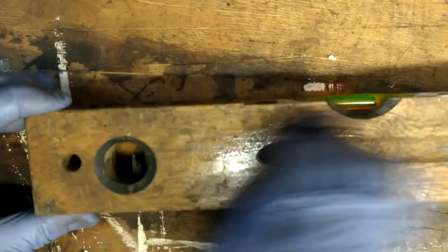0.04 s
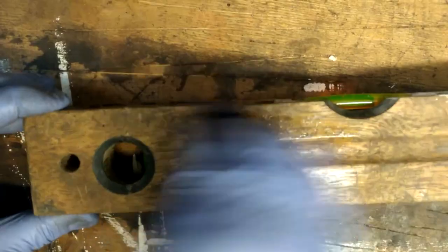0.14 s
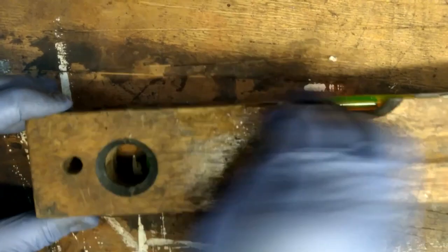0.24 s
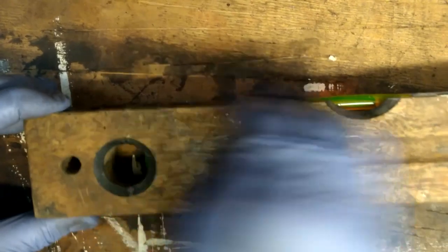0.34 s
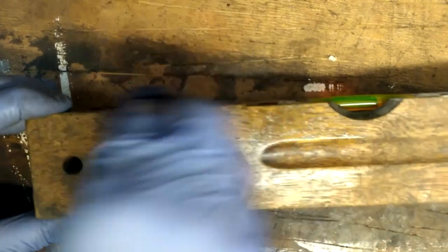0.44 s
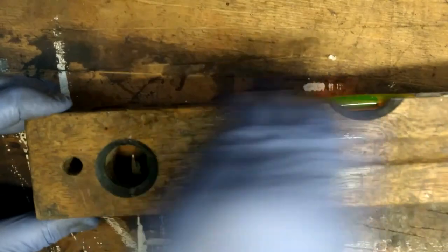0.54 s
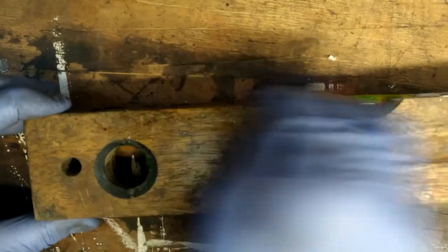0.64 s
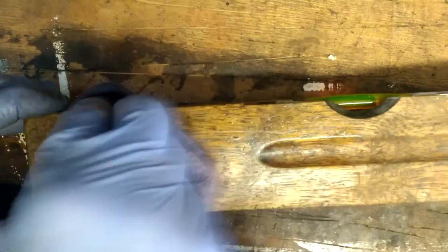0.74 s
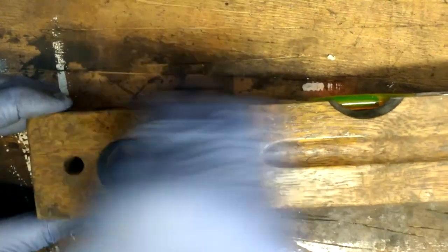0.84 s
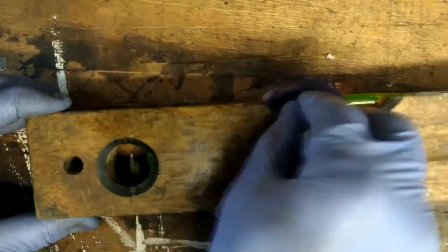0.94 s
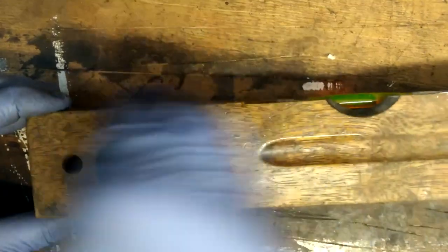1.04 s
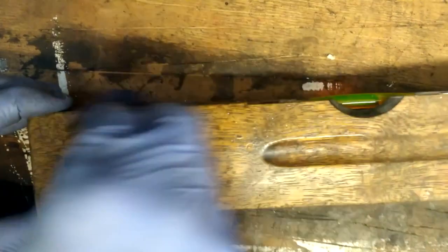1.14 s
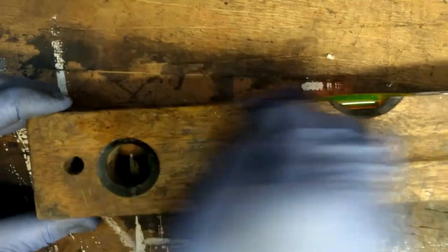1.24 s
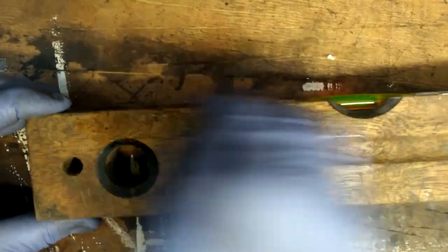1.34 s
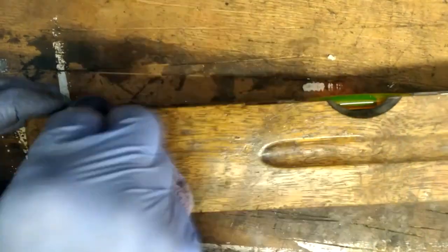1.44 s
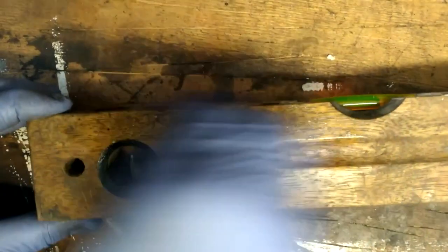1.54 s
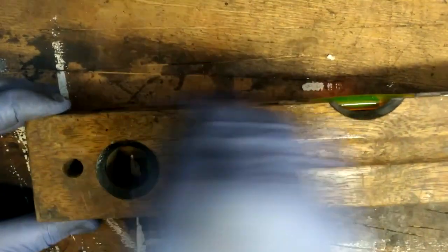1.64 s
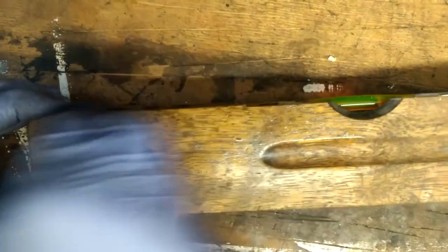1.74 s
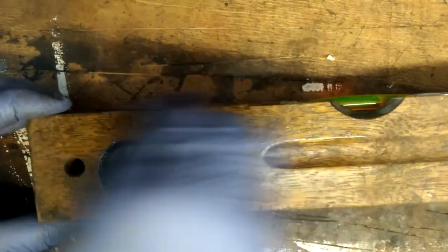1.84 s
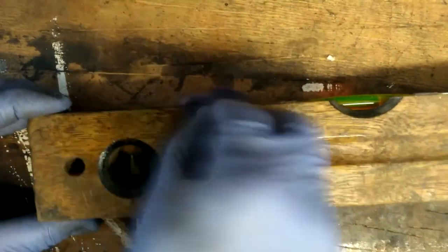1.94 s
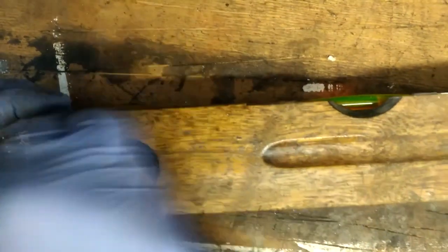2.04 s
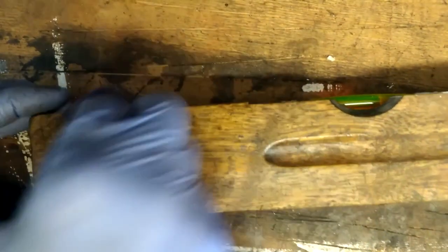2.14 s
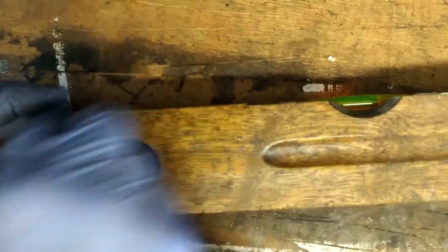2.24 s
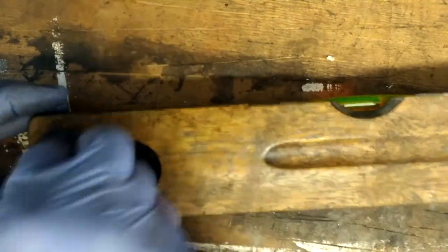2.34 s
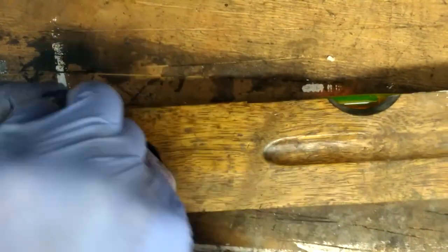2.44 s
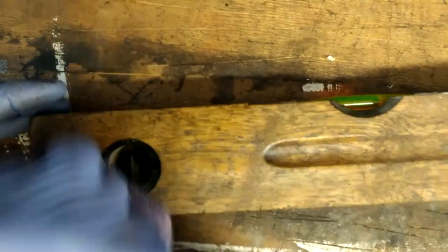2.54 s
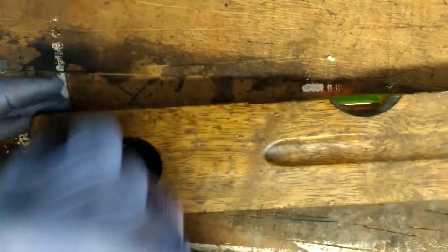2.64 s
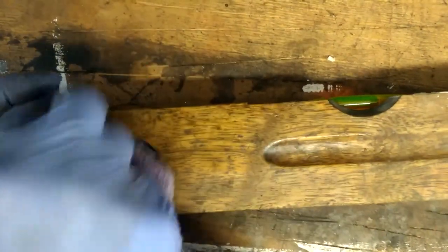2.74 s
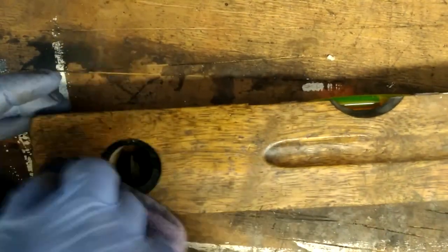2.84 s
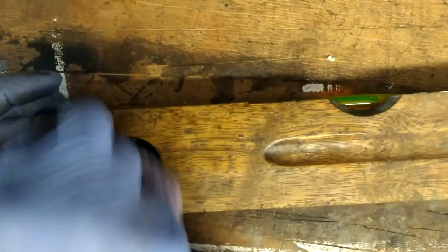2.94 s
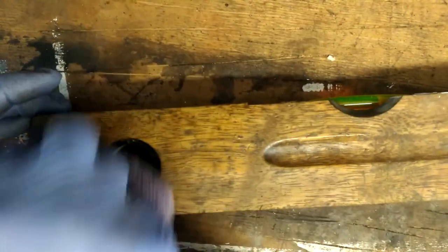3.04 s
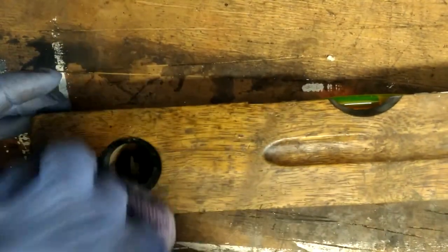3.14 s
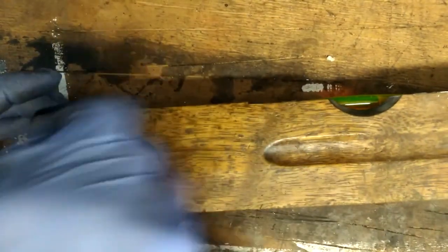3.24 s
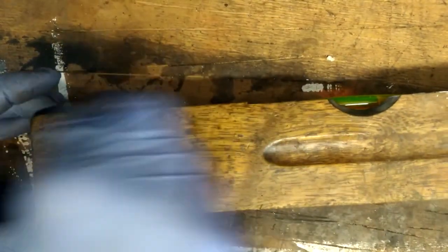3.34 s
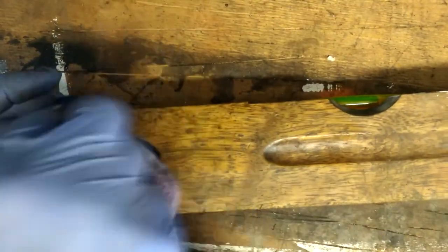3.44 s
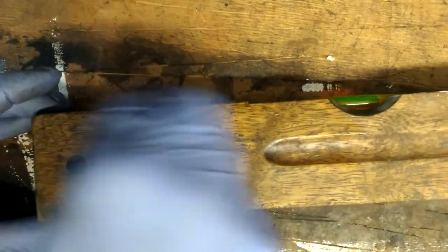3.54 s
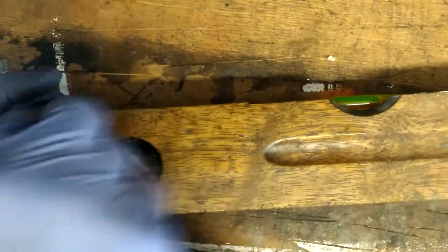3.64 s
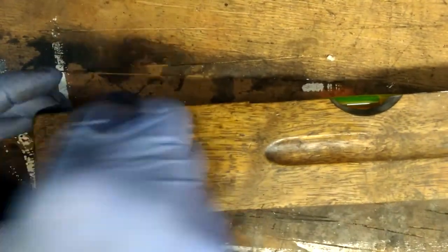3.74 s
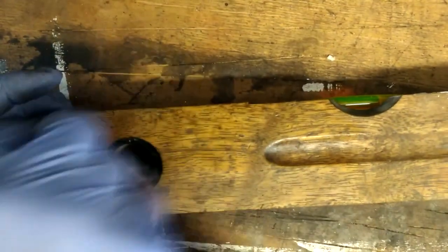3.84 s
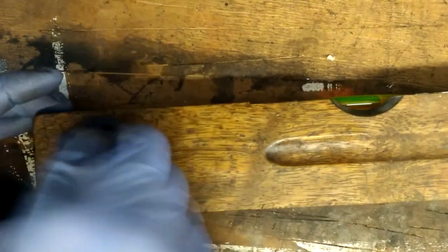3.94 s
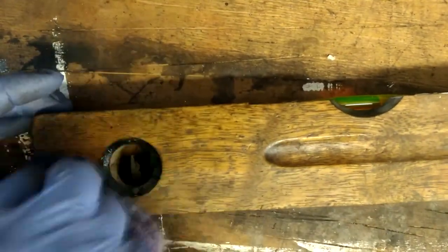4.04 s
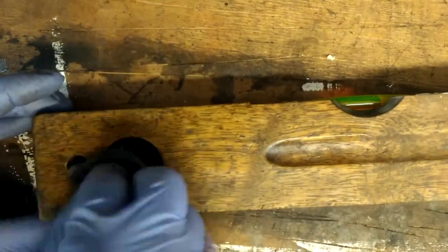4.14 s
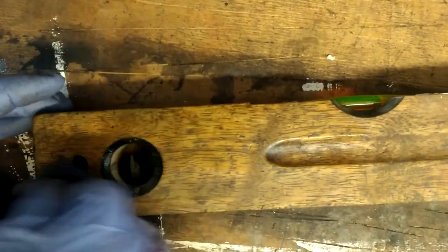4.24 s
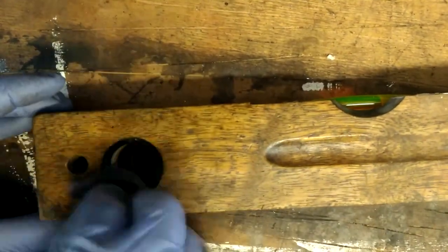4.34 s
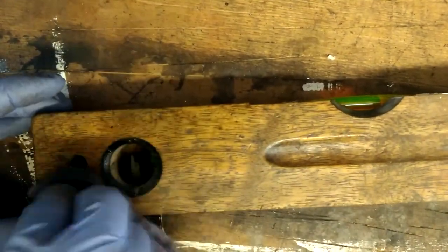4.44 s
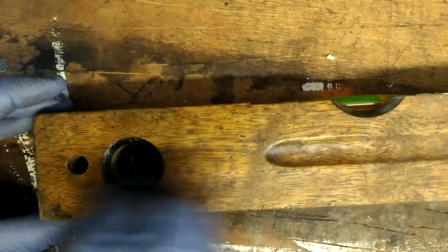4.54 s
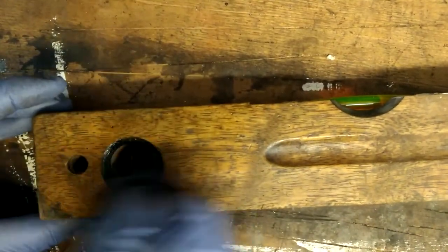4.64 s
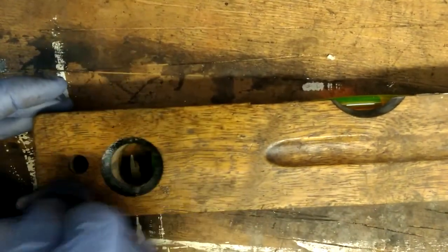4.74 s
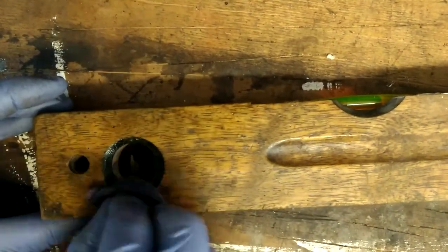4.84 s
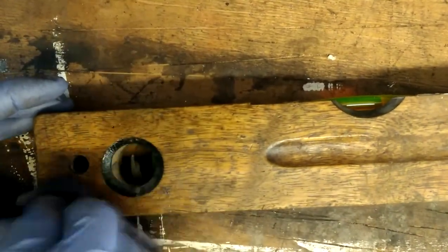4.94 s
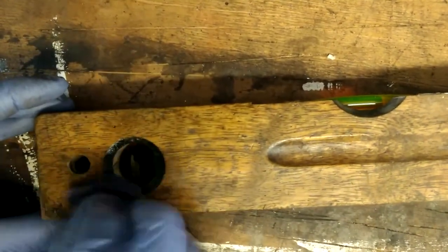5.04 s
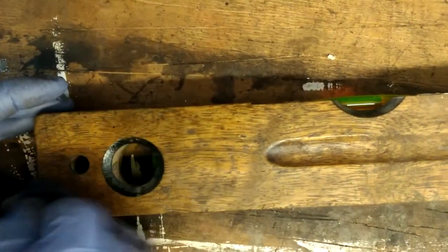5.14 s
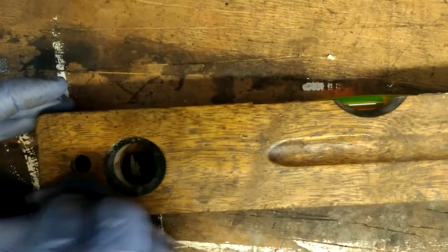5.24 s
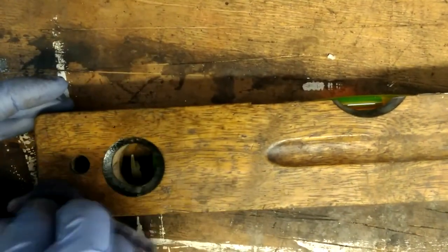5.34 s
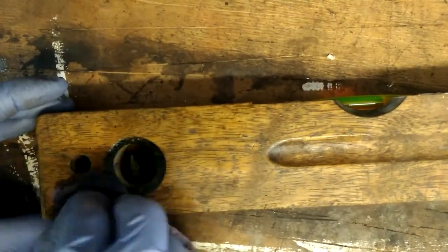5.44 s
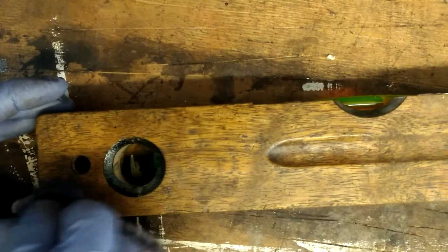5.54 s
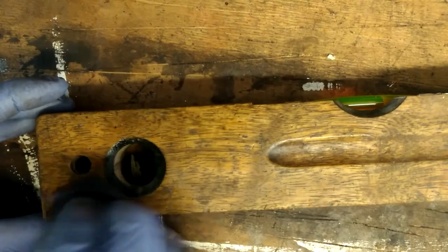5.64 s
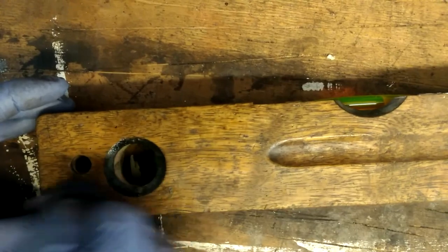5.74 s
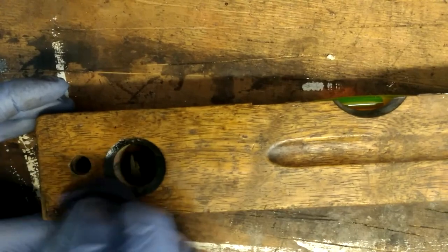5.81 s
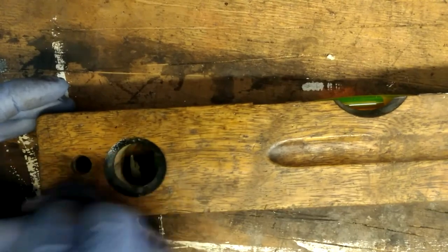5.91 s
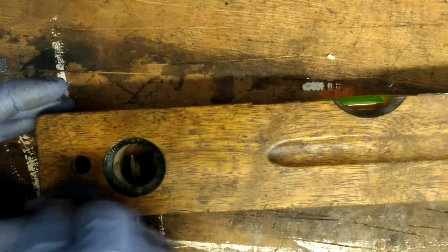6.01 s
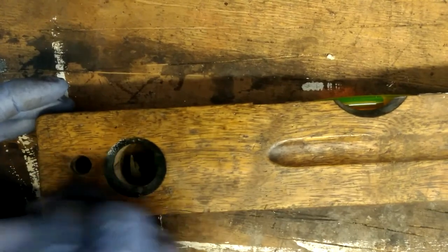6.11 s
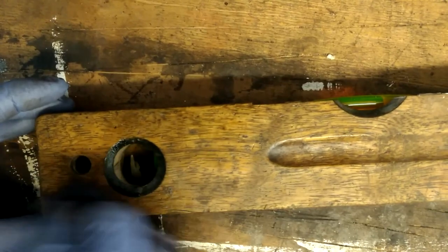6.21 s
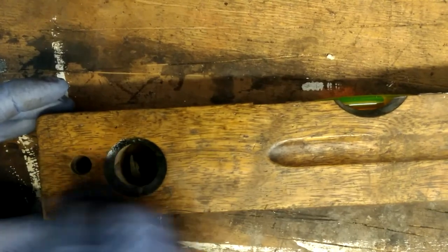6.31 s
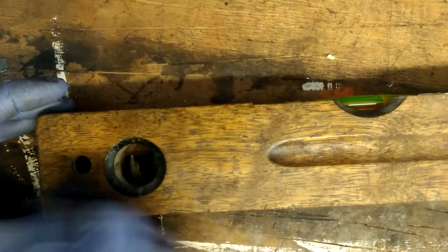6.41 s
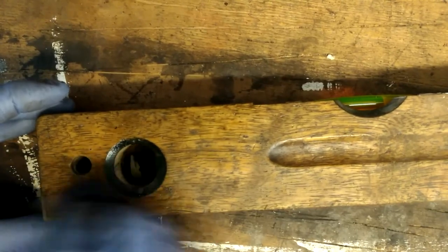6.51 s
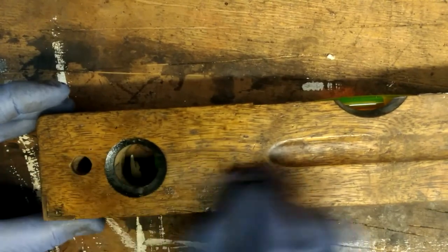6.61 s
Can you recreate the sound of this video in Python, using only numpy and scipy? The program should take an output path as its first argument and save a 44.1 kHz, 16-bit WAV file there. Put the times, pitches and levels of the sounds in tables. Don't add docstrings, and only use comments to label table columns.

```python
import sys
import numpy as np
from scipy import signal
from scipy.fft import rfft, irfft
from scipy.io import wavfile
from scipy.ndimage import uniform_filter1d

SR = 44100
rng = np.random.default_rng(int(sys.argv[2]) if len(sys.argv) > 2 else 0)


def log_audio(samples):
    frames = np.atleast_2d(samples).T
    limited = np.clip(frames, -1, 1)
    pcm = np.round(limited * 32767).astype(np.int16)
    wavfile.write(sys.argv[1], SR, pcm)


def elevation(decibels):
    levels = np.asarray(decibels, float)
    return 10 ** (levels / 20)


N = 294147
T = np.arange(N) / SR


def evened(x):
    return x / np.sqrt(np.mean(x ** 2) + 1e-20)


def read(points, hz):
    f, value = np.transpose(points)
    return np.interp(np.log(hz + 1), np.log(f + 1), value)


def coloured(x, points):
    hz = np.fft.rfftfreq(len(x), 1 / SR)
    return irfft(rfft(x) * elevation(read(points, hz)), len(x))


def resonate(x, hz, width):
    turn = np.exp(2j * np.pi * np.cumsum(hz * np.ones(len(x))) / SR)
    r = np.exp(-np.pi * width / SR)
    smooth = signal.lfilter([1 - r], [1, -r], x / turn)
    return 2 * (turn * smooth).real


def ring(x, modes):
    out = 0
    for k, (hz, width, db) in enumerate(modes):
        out = out + (-1) ** k * elevation(db) * resonate(x, hz, width)
    return out


def steadied(x, seconds, share):
    size = round(seconds * SR)
    power = uniform_filter1d(uniform_filter1d(x ** 2, size), size)
    return evened(x / (abs(power) + 1e-20) ** (share / 2))


def drift(seconds):
    size = max(round(seconds * SR), 2)
    return evened(uniform_filter1d(uniform_filter1d(rng.standard_normal(N), size), size))


def catches(per_s, spread_db):
    size_db = spread_db * np.minimum(rng.exponential(1, N), 5)
    size = elevation(size_db) * rng.choice([-1., 1.], N)
    return evened(size * (rng.random(N) < per_s / SR))


# (start [s], stop [s], speed [dB], pressure [dB])
FACE_STROKES = [(0.052, 0.119, -38.5, -42.5), (0.151, 0.235, -40, -41.5), (0.275, 0.355, -41, -47.5),
                (0.391, 0.488, -38, -43), (0.53, 0.657, -41, -45), (0.698, 0.814, -39, -39),
                (0.841, 0.987, -40, -41.5), (1.029, 1.143, -38, -39.5), (1.198, 1.329, -40, -41.5),
                (1.367, 1.493, -40, -40.5), (1.528, 1.665, -41.5, -41), (1.705, 1.833, -40.5, -41),
                (1.86, 1.99, -42.5, -41), (2.02, 2.129, -41.5, -41.5), (2.161, 2.224, -45, -41)]
# (start [s], stop [s], speed [dB], pressure [dB])
RIM_STROKES = [(2.269, 2.356, -43, -43), (2.442, 2.503, -42, -37.5), (2.55, 2.64, -43, -42.5),
               (2.677, 2.769, -43, -38), (2.814, 2.905, -43, -42.5), (2.958, 3.037, -42, -37.5),
               (3.084, 3.157, -41, -41.5), (3.211, 3.376, -43, -40), (3.415, 3.492, -45.5, -42),
               (3.527, 3.611, -45, -41.5), (3.643, 3.719, -41.5, -39.5), (3.761, 3.821, -44.5, -43),
               (3.861, 3.932, -45, -43.5), (3.959, 4.043, -46.5, -46), (4.048, 4.124, -47, -41),
               (4.146, 4.206, -45, -47)]
# (start [s], stop [s], speed [dB], pressure [dB])
EDGE_FLICKS = [(4.234, 4.3, -41, -47.5), (4.332, 4.406, -45.5, -46), (4.443, 4.507, -45.5, -47.5),
               (4.543, 4.648, -43.5, -46), (4.684, 4.783, -40, -45.5), (4.808, 4.889, -44, -43),
               (4.928, 5.007, -41.5, -43.5), (5.04, 5.108, -44, -43.5), (5.138, 5.214, -41.5, -43.5),
               (5.259, 5.309, -41, -40), (5.355, 5.406, -47.5, -45.5), (5.441, 5.496, -42, -46.5),
               (5.533, 5.583, -45, -44), (5.615, 5.671, -43, -43.5), (5.709, 5.753, -44, -45.5),
               (5.787, 5.847, -45.5, -42), (5.878, 5.934, -43, -46.5), (5.966, 6.026, -44.5, -43),
               (6.059, 6.121, -44, -46.5), (6.153, 6.214, -46.5, -43), (6.247, 6.302, -41.5, -47.5),
               (6.336, 6.404, -41.5, -43)]
# (start [s], stop [s], speed [dB], pressure [dB])
SLACK_STROKES = [
    (2.335, 2.44, -51, -50.5),
    (6.542, 6.707, -45.5, -52),
]
# (start [s], stop [s], speed [dB], pressure [dB])
LIFT_OFF = [
    (6.442, 6.514, -56, -73),
]
# (opening speed [dB], slower opening per length [dB/s],
# hole relative to pressure [dB], hole louder outward [dB])
MANNER = [
    (-44, 95, -12.5, 4),
    (-45.5, 40, -4, 1.5),
    (-53.5, 5, -4, 2.5),
    (-57, -13, -4, -1),
    (-44, 0, -4, 0),
]
# (time [s], level [dB])
ARM_WEIGHT = [(0, -9), (.3, -12), (.6, -18.5), (1.2, -18.5), (2.3, -15.5), (3.3, -16.5), (4.2, -13.5),
              (5.2, -17.5), (6.4, -16)]


def strokes():
    usual_s = 0.1
    tables = FACE_STROKES, RIM_STROKES, EDGE_FLICKS, SLACK_STROKES, LIFT_OFF
    rows = []
    for table, (opening_db, slower_db, hole_db, outward_db) in zip(tables, MANNER):
        for k, (start, stop, speed_db, press_db) in enumerate(table):
            open_db = opening_db - slower_db * (stop - start - usual_s)
            air_db = press_db + hole_db + outward_db * (-1) ** k
            bench_db = press_db + np.interp(start, *np.transpose(ARM_WEIGHT))
            rows.append((start, stop, open_db, speed_db, press_db, air_db, bench_db))
    return rows


def stroked(levels_db, rise_s, fall_s, creep_s):
    t, power = T[::64], 0
    for (start, stop, *_), (early, late) in zip(strokes(), levels_db):
        length = stop - start
        level = elevation(np.interp(t, [start + 0.03 * length, stop - 0.24 * length], [early, late]))
        begun = (1 + np.tanh((t - start) / rise_s)) / 2
        moving = begun * (1 - np.tanh((t - stop) / fall_s)) / 2
        creeping = begun * np.exp(-np.maximum(t - stop, 0) / creep_s)
        power = power + (level * np.array([moving, creeping])) ** 2
    return [np.interp(T, t, np.sqrt(p)) for p in power]


# (frequency [Hz], level [dB per Hz])
ROOM_TONE = [(25, 14), (60, 8), (110, -3), (350, -3), (1000, -8), (3000, -12), (15400, -27.5)]


def room_tone():
    return elevation(-56.5) * evened(coloured(rng.standard_normal(N), ROOM_TONE))


# (frequency [Hz], width [Hz], level [dB])
BENCH_MODES = [(97, 12.1, 1.5), (141, 11.6, 0), (169.6, 172, -11)]


def bench():
    lands_s, lifts_s = 0.047, 6.47
    rocking_db, idle_db = 6.5, -58
    moving, creeping = stroked([(row[6], row[6]) for row in strokes()], 0.024, 0.18, 0.25)
    lifted = 1 - 0.65 * np.exp(-((T - lifts_s - 0.05) / 0.057) ** 2)
    level = elevation(rocking_db) * (moving + elevation(-9) * creeping) * lifted
    level += elevation(idle_db) * (T < lands_s)
    return level * steadied(ring(rng.standard_normal(N), BENCH_MODES), 0.05, 0.8)


# (time [s], peak [dB], push [ms], share that reaches the bench [ratio])
KNOCKS = [(0.048, -28.5, 0.44, 0.5), (0.056, -22, 0.29, 0.1), (.082, -28, 0.43, 0.2), (0.205, -46, 0.86, 1),
          (0.277, -34.5, 1.2, 0.9), (0.673, -38, 1.8, 0.2), (1.060, -35, 2.2, 0.1),
          (2.014, -35.5, 1.4, 0.14), (2.382, -39.5, 1.3, 0.2), (2.938, -40, 1.5, 0.4),
          (2.973, -38, 5.8, 0.57), (4.073, -57, 0.99, .6), (4.079, -35.5, 4, 1.5), (4.098, -56, 1.3, 1.4),
          (4.235, -44, 2.4, 0), (4.659, -39.5, 1.7, 1.1), (5.285, -36, 3.2, 0.4), (6.443, -38, 0.83, 0),
          (6.458, -44, 1.2, 0.5)]
# (frequency [Hz], width [Hz], level [dB])
THUD_MODES = [(95, 13, 5), (183, 50, -3)]


def knocks():
    in_wood, in_bench = np.zeros((2, N + SR))
    for s, db, ms, share in KNOCKS:
        push = elevation(db) * np.hanning(round(ms * SR / 1000) + 2)
        at = round(s * SR)
        in_wood[at:at + len(push)] += push
        in_bench[at:at + len(push)] += share * push
    return elevation(10.5) * ring(in_wood[:N], WOOD_MODES) + elevation(13) * ring(in_bench[:N], THUD_MODES)


# (frequency [Hz], level [dB per Hz])
HISS_COLOUR = [(300, -41), (1000, -22.5), (1500, -5), (2300, -6), (3500, -0.5), (5500, -2), (8000, 3.5),
               (9500, 3), (11300, 7), (13000, 3), (14600, 1.5), (15400, 2)]
# (frequency [Hz], level [dB])
CREEP_COLOUR = [(1000, 8.5), (3000, 1.5), (6000, -4.5), (12000, -33)]


def hiss():
    fine = coloured(catches(12000, 2.3) + 0.8 * rng.standard_normal(N), HISS_COLOUR)
    z = signal.stft(fine, nperseg=256)[2]
    patches = rng.standard_normal(z.T.shape)
    patches = uniform_filter1d(uniform_filter1d(patches, 14, 0), 12, 1).T
    fine = evened(signal.istft(z * elevation(1.02 * evened(patches)), nperseg=256)[1][:N])
    moving, creeping = stroked([row[2:4] for row in strokes()], 0.008, 0.017, 0.11)
    dull = elevation(-6) * coloured(fine, CREEP_COLOUR)
    return elevation(1.0 + 0.33 * drift(0.054)) * (fine * moving + dull * creeping)


# (frequency [Hz], width [Hz], level [dB])
WOOD_MODES = [(184, 7.9, -11), (276.3, 11.6, -2), (320.7, 16.3, 5), (351, 43.4, 6), (452.7, 30.5, 1.5),
              (596, 87, -6), (808, 65, -2.5), (920, 69, -5), (1240, 54, -9.5)]


def wood():
    builds_db = 1.5
    levels_db = [(row[4] - builds_db, row[4] + 0.4 * builds_db) for row in strokes()]
    moving, creeping = stroked(levels_db, 0.012, 0.035, 0.09)
    lumpy = catches(2000, 4.1) * elevation(1.6 * drift(0.023))
    body = steadied(ring(lumpy, WOOD_MODES), 0.022, 1.0)
    return elevation(-9.5) * body * (moving + elevation(-4.5) * creeping)


# (time [s], pitch [Hz])
HOLE_PITCH = [(0, 2250), (1.9, 2280), (2.3, 1930), (4.0, 1950), (4.8, 1980), (6.67, 2000)]


def hole():
    levels_db = [(row[5] - 5, row[5] + 2.5) for row in strokes()]
    moving, creeping = stroked(levels_db, 0.012, 0.018, 0.045)
    hz = np.interp(T, *np.transpose(HOLE_PITCH)) * (1 + 0.012 * drift(0.05))
    drive = catches(6000, 0.63)
    air = resonate(resonate(drive, hz, 300), hz, 300)
    air += elevation(3) * resonate(drive, 1.02 * hz, 45)
    air += resonate(drive, 1222, 50)
    return elevation(-9.5) * steadied(air, 0.031, 0.24) * (moving + elevation(-18.0) * creeping)


# (time [s], peak [dB])
SNAPS = [
    (.0543, -30),
    (.1615, -27),
    (.391, -29),
    (6.4625, -17.5),
]


def snaps():
    out = np.zeros(N)
    for s, db in SNAPS:
        out[round(s * SR)] = elevation(db)
    tick = np.diff(rng.standard_normal(90) * np.exp(-np.arange(90) / 8))
    return signal.oaconvolve(out, tick / abs(tick).max())[:N]


def scrambled(x):
    z = signal.stft(x, nperseg=512, noverlap=384)[2]
    phases = np.exp(2j * np.pi * rng.random(z.T.shape).T)
    other = signal.istft(z * phases, nperseg=512, noverlap=384)[1][:N]
    return evened(other) * np.std(x)


# (frequency [Hz], phase by which right leads [rad])
PORT_LEAD = [(62, 3.14), (110, 1.8), (380, 1.35), (1380, .55), (1600, 3.2), (2750, 6.3), (3200, 8.55),
             (3700, 9.9), (5400, 15.71), (7150, 21.99), (8700, 27.2), (9450, 25.13), (10700, 21.99),
             (15800, 10.1)]
# (frequency [Hz], share [ratio])
PORT_LOCKED = [(60, .9), (150, .2), (350, .7), (1000, .9), (2600, .4), (8500, .45), (12500, .7)]
# (frequency [Hz], level [dB])
LEFT_OVER_RIGHT = [(60, -1), (95, -2.5), (140, -1), (210, 1.5), (330, 5.5), (500, 3.5), (770, 2.5),
                   (1170, -1), (1790, 1), (2700, 0)]
# (frequency [Hz], level relative to direct [dB])
SCATTERED = [(60, -25), (150, -4), (400, -8), (1100, -17), (1600, -1), (2100, -9), (2700, -2),
             (3400, -10.5), (4200, -17), (6300, -16), (7300, 0), (9600, -4), (10500, -16), (13400, -7)]


def ports(x):
    waves = [x, scrambled(x), scrambled(x), scrambled(x)]
    hz, t, (near, other, *far) = signal.stft(waves, SR, nperseg=512, noverlap=384)
    wander = 0.2 * np.interp(t, T, drift(0.06))
    half = (np.interp(hz, *np.transpose(PORT_LEAD))[:, None] + wander) / 2
    locked = read(PORT_LOCKED, hz)[:, None]
    mid = np.cos(half) * near
    side = -1j * np.sin(half) * (locked * near + np.sqrt(1 - locked ** 2) * other)
    scattered = elevation(read(SCATTERED, hz))[:, None]
    pair = np.array([mid + side, mid - side]) + scattered * np.array(far)
    pair = pair / np.sqrt(1 + scattered ** 2)
    tilt = elevation(read(LEFT_OVER_RIGHT, hz)[:, None] / 2)
    return signal.istft([pair[0] * tilt, pair[1] / tilt], SR, nperseg=512, noverlap=384)[1][:, :N]


def scene():
    return ports(room_tone() + bench() + knocks() + hiss() + wood() + hole() + snaps())


# (frequency [Hz], level [dB])
TOP_EDGE = [(15430, 0), (15560, -26), (15800, -48), (15880, -100)]


def microphones(x):
    rolled = signal.sosfilt(signal.butter(2, 70, "high", fs=SR, output="sos"), x)
    return np.array([coloured(channel, TOP_EDGE) for channel in rolled])


def top_cut(x):
    return signal.sosfilt(signal.butter(12, 16450, fs=SR, output="sos"), x)


def record(dry):
    mix = microphones(dry)
    return top_cut(mix)


dry = scene()
out = record(dry)
log_audio(out)
```